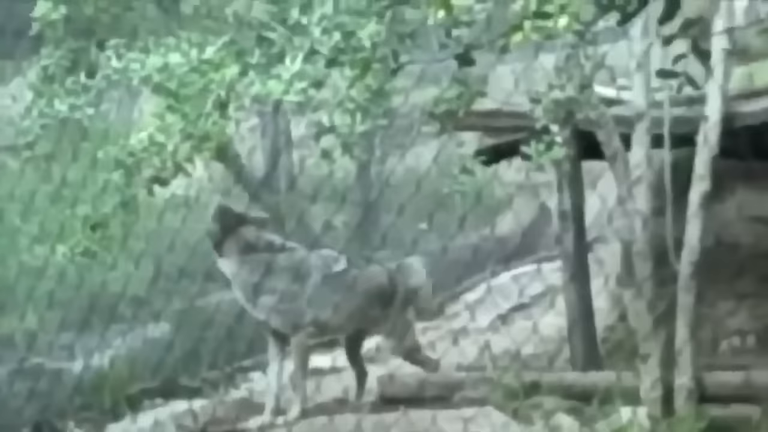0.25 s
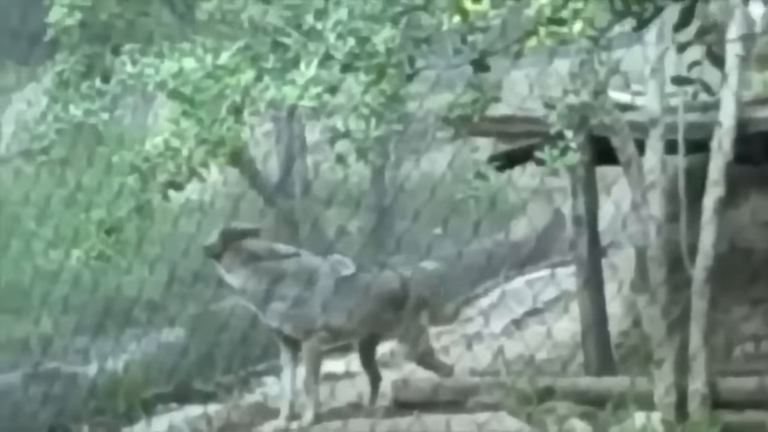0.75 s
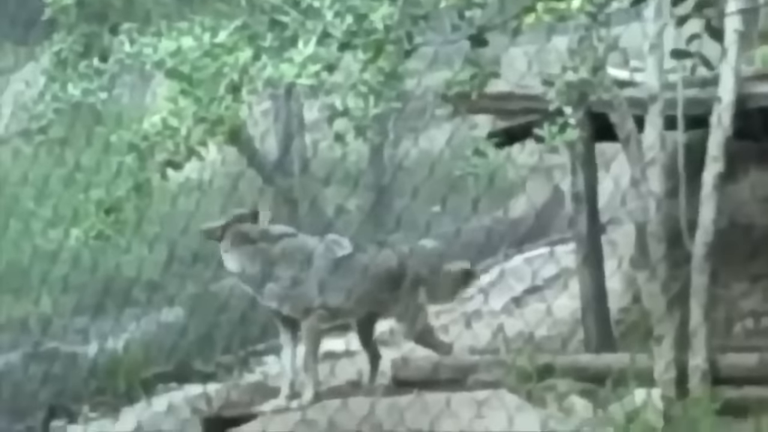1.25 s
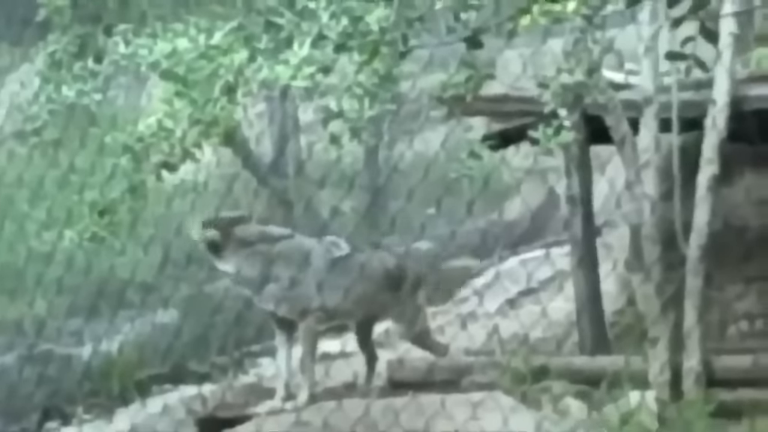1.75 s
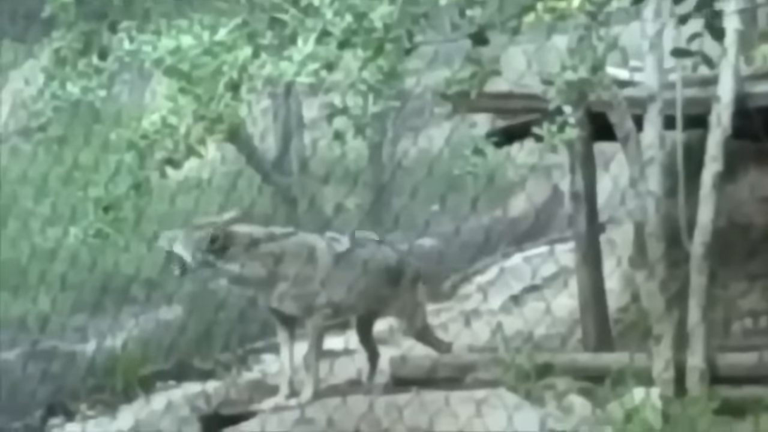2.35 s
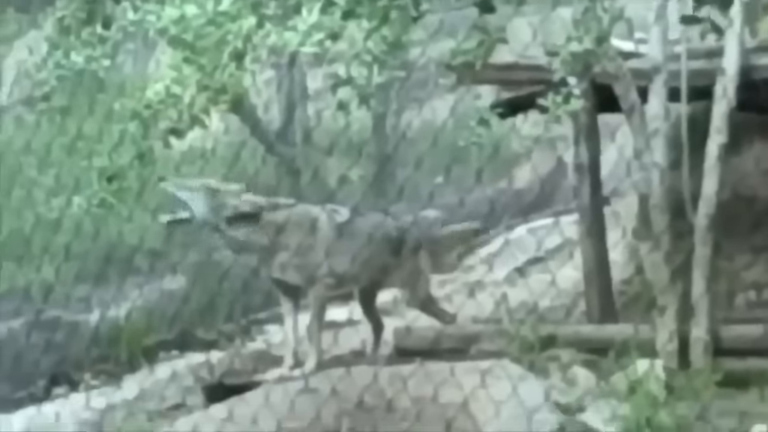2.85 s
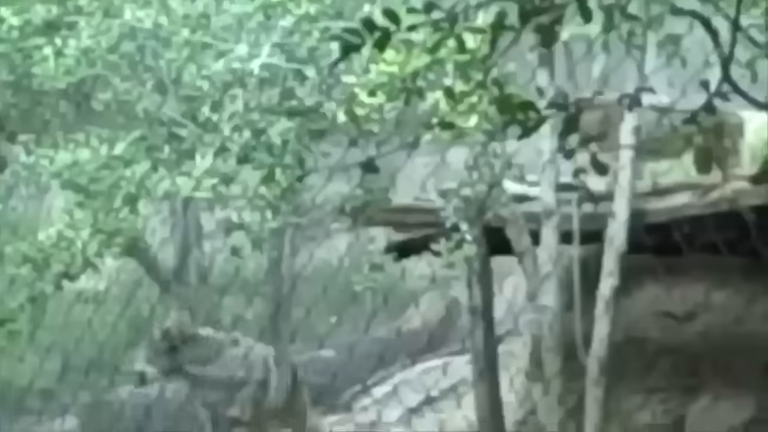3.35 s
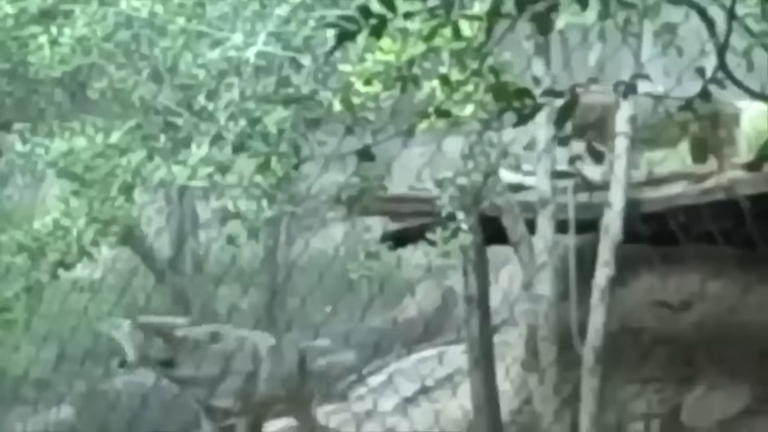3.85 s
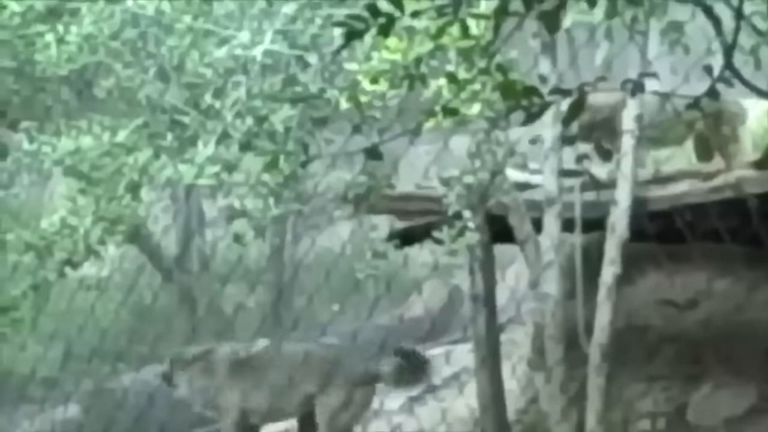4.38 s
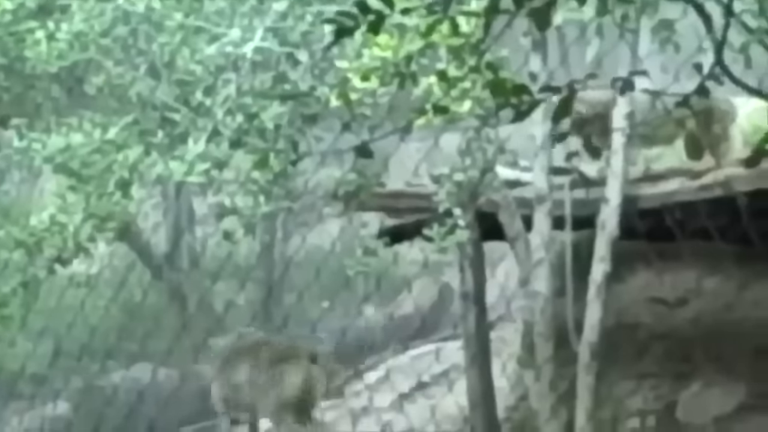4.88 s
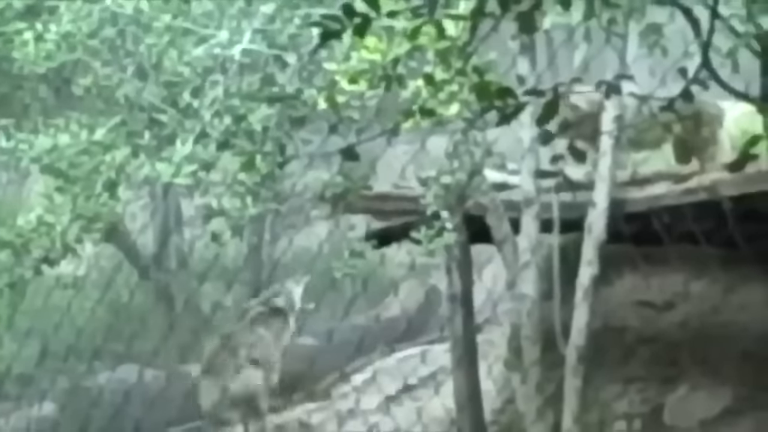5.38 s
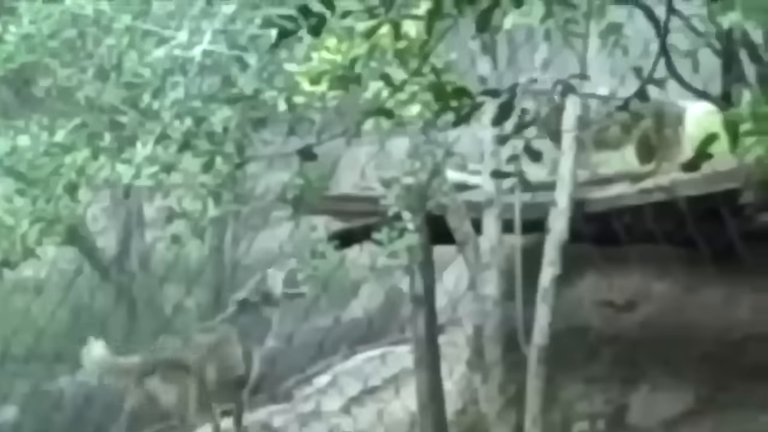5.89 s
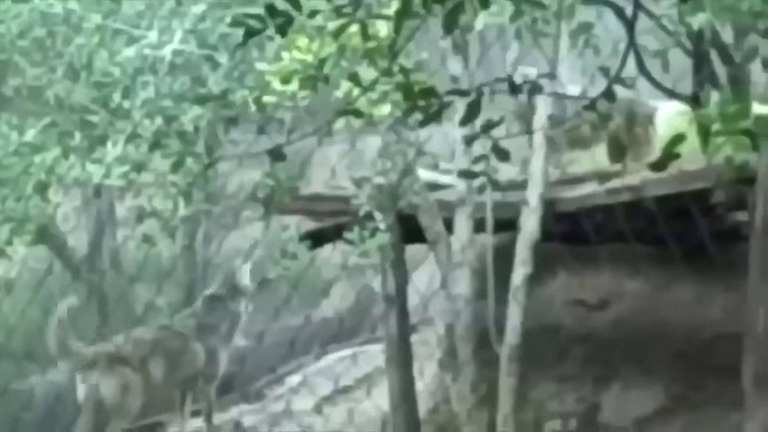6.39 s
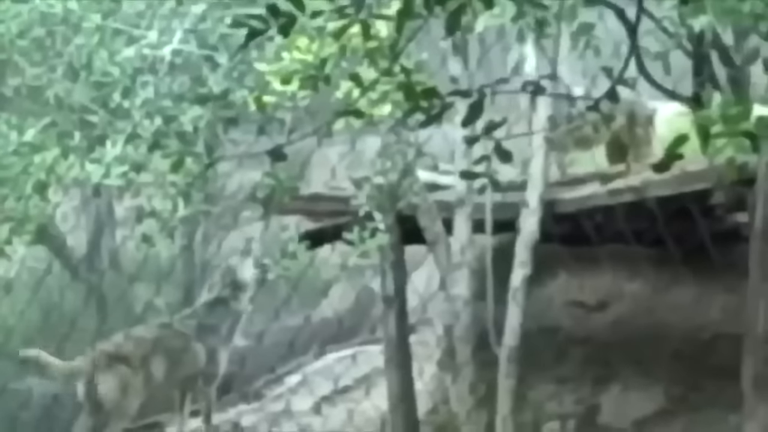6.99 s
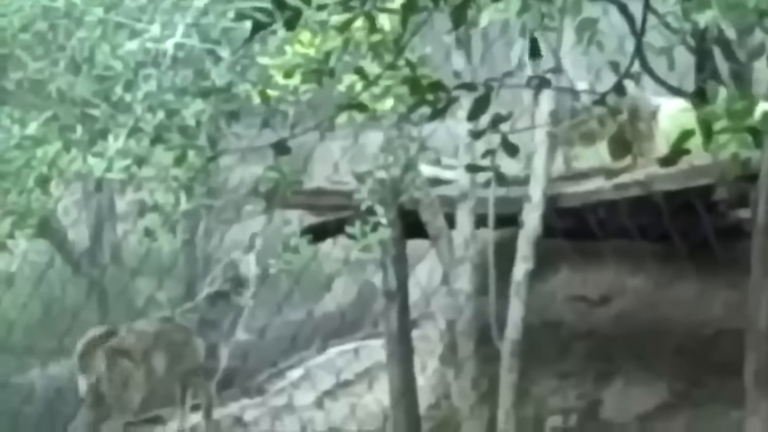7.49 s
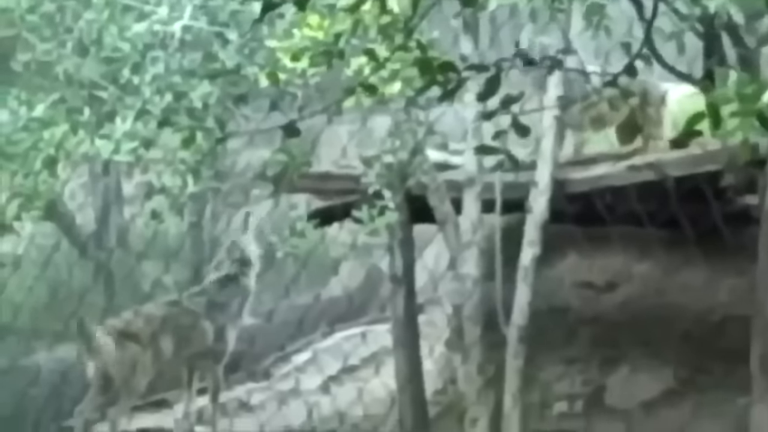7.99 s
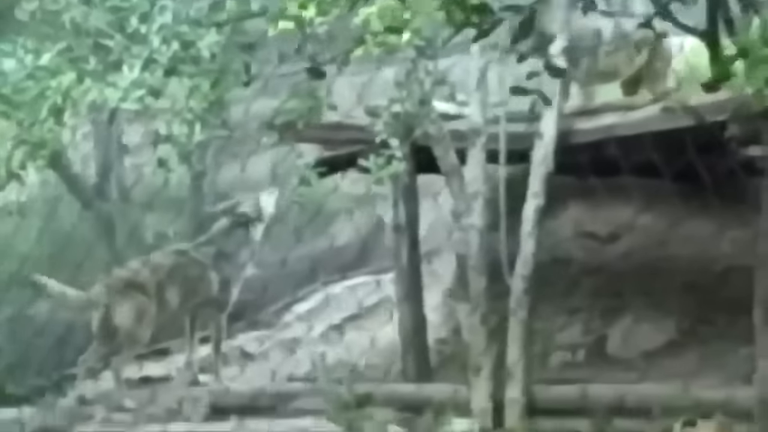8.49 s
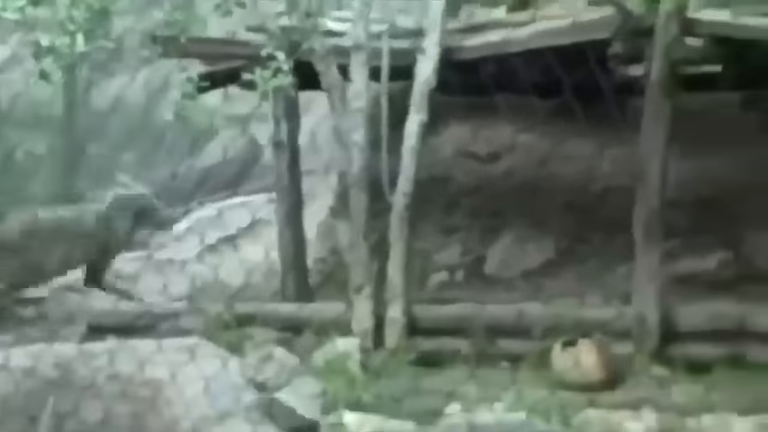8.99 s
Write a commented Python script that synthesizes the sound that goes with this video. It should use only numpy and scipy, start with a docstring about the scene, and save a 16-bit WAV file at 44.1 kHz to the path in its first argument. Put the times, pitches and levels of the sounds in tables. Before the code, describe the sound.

From 0 s coyotes are already calling: a high yelp falls quickly over a steadier clear howl, and a hoarse bark joins at 0.4 s. Around 0.6-2 s a high howl wavers, leaps up near 1.3 s, then slides far down while lower voices overlap. From 2.2 s rough barks gather, with a shrill cracked burst near 2.7-2.9 s. Through 3-5 s low falling yips, short barks and a clear strong yelp at 4 s mix with a high, shaky cry at 4.3-4.8 s. Another high swoop comes at 5.1-5.4 s. From 5.5 to 8.2 s raspy barks and quick yelps tumble together. The last calls sink into wavering moans, ending by 8.9 s. Short diffuse echoes come off trees and rock. Quiet air and distant traffic rumble remain, with a faint rustle and sharp dry ticks near the microphone at about 9.1 s.

```python
"""Coyote chorus in a wooded pen

Several coyotes howl, yip and bark over one another, then break off. Clean calls are gliding harmonic series;
barks add half tones by period doubling, with rasp where the voice breaks into chaos. Trees and rock return the
calls as a decaying noise tail. Shaped noise makes the far traffic rumble and air, under a faint drone; ticks and
a rustle of noise come at the end. A limiter, a soft ceiling, a high-passed hiss scaled by the loudness, and a
low-pass end the chain."""
import sys
import numpy as np
from scipy import signal
from scipy.fft import rfft, irfft, next_fast_len
from scipy.io import wavfile
from scipy.ndimage import uniform_filter1d, minimum_filter1d

SR = 44100
rng = np.random.default_rng(int(sys.argv[2]) if len(sys.argv) > 2 else 0)


def materialize(psi):
    """Save the field psi as 16-bit PCM at rate SR to the path in sys.argv[1].

    A 1-D psi becomes a single channel; in a 2-D psi each row is a channel.
    """
    bounded = np.clip(np.atleast_2d(psi).T, -1, 1)
    quanta = np.round(bounded * 32767).astype(np.int16)
    wavfile.write(sys.argv[1], SR, quanta)


N = 407484

# background spectrum, relative: hz, density_db (per Hz)
AIR_SPECTRUM = [(20, -8), (65, 2), (120, 1.5), (190, -3), (320, -8.5), (2500, -12.5), (4500, -32.5),
                (7500, -21.5), (15500, -45)]
AIR_DB = -44.5  # mean level, about which the background wavers
# faint drone passing far off: time_s, pitch_hz, level_db
DRONE = [(3.3, 269, -49.5), (3.6, 263, -44), (3.95, 272, -53), (4.2, 287, -45), (4.6, 283, -59),
         (9.24, 243, -54)]
# leaves or cloth stirring: time_s, level_db
RUSTLE = [(9.04, -70), (9.078, -52), (9.24, -54.5)]
# dry ticks nearby: time_s, peak_db
TICKS = [(9.081, -28), (9.086, -29), (9.0892, -23)]
ECHO_T60_S, ECHO_DB, ECHO_CUT_HZ = 0.3, -8.5, 11500

# filtering by mouth and distance: hz, gain_db
THROAT = [(900, 27), (1900, 17), (2900, 3.5), (3700, -13), (4700, -18.5), (7000, -22.5), (10000, -25.5),
          (11500, -38)]
# breath noise spectrum, relative: hz, density_db (per Hz)
BREATH_SPECTRUM = [(300, -82), (800, -13), (1500, 0), (3200, -24.5), (4100, -31.5), (7500, -23.5),
                   (15500, -40.5)]
# lift of the overtones above the edge: time_s, lift_db
TREBLE = [(0, 6.5), (1.3, -5), (1.9, 6.5), (3.2, 2.5), (5.6, 2.5), (8.3, 7), (9.0, 9.5)]
TREBLE_EDGE_HZ = 5800
# overtones above the edge weaken by this much per octave a second of glide
GLIDE_LOSS_DB, GLIDE_EDGE_HZ = 0.9, 3400

# hoarse barks: start_s, turn_s, end_s, start_hz, turn_hz, end_hz, first_partial_db, second_partial_db,
# half_tone_db, fade_after_turn_db, higher_lift_db
BARKS = [ (0.4, 0.471, 0.63, 619.6, 935.4, 902.5, -18.5, -23, -21.5, 6, 5),
         (2.269, 2.315, 2.4, 529.5, 689, 584, -30.5, -28.5, -25, 3.5, 7),
         (2.415, 2.445, 2.545, 637, 712.6, 630, -28, -22.5, -34.5, 7.5, 5.5),
         (2.8, 2.866, 3.07, 508.3, 790, 841, -30.5, -31, -30, -1.5, 13),
         (3.478, 3.529, 3.67, 529.5, 806.7, 798, -18.5, -21.5, -20.5, 21, 6),
         (3.683, 3.766, 3.84, 484, 776, 906, -22, -31.5, -31, 12, 14),
         (3.903, 3.944, 4.02, 873, 924, 925, -24.5, -34.5, -20.5, -2, 12.5),
         (4.258, 4.291, 4.37, 769, 832, 985, -26, -26, -29, 4, 3),
         (4.444, 4.529, 4.69, 699, 865, 787, -23, -25, -27, 6, -4),
         (4.831, 4.907, 5.06, 746, 960.5, 917, -15, -21.5, -39.5, 12.5, 4.5),
         (4.985, 5.087, 5.15, 647.4, 818, 934, -32.5, -31, -31, -7, 11.5),
         (5.308, 5.348, 5.45, 577, 683, 838, -33, -33, -27.5, -13, 9),
         (5.557, 5.636, 5.75, 600.6, 910, 987, -17.5, -19, -23.5, 3.5, 13),
         (6.091, 6.198, 6.29, 437.7, 909, 850, -30.5, -29, -23, -4, 12),
         (6.29, 6.405, 6.46, 518.7, 869, 878, -21.5, -28, -22, -4, 4),
         (6.641, 6.685, 6.712, 684, 912, 1000, -19.5, -23, -18, -2, 9.5),
         (6.702, 6.717, 6.787, 906, 885, 938, -19.5, -15, -20, 6.5, 9),
         (6.868, 6.905, 6.99, 656, 799, 746, -24, -28, -21, 12, 3),
         (7.07, 7.155, 7.275, 619, 913, 841, -21, -23, -17.5, 4.5, 5),
         (7.547, 7.607, 7.66, 647, 851, 900, -16.5, -25, -19.5, -1.5, 8),
         (7.812, 7.869, 7.94, 940, 996, 860, -30, -23, -21, 3, 4.5),
         (8.091, 8.141, 8.225, 618.4, 840.6, 750, -19.5, -26, -22, 10, -3), ]
# depth of each part under its own level: start_db, midway_db, end_db (beyond the fade)
FIRST_UNDER = (10.5, 0.85, 10.2)
SECOND_UNDER = (19, 3.9, 1)
HALF_UNDER = (66, 7.5, 11.8)
SCOOP_SHARE = 0.55  # share of the change in pitch done halfway to the turn
BARK_LIFT_EDGE_HZ = 3900  # a bark's higher lift stops here
# breaks into chaos: time_s, half_width_s, depth (0-1), rasp_db, shrill_rasp_db
BREAKS = [(2.667, 0.014, 0.7, -28, -28.5), (2.783, 0.0055, 0.55, -31, -28.5), (2.9, 0.15, 0, -32, -52),
          (3.52, 0.04, 0.24, -39, -40.5), (3.785, 0.06, 0.38, -32.5, -42), (3.95, 0.05, 0.32, -24, -48),
          (4.321, 0.034, 0.62, -28, -33), (5.121, 0.054, 0.7, -28, -31.5), (5.604, 0.041, 0.28, -24, -31),
          (6.167, 0.032, 0.29, -37, -31), (6.26, 0.085, 0.01, -31, -27), (7.602, 0.069, 0.14, -31, -54),
          (7.88, 0.058, 0.26, -36, -27.5), (8.525, 0.02, 0.1, -39, -51)]
# band of the shrill rasp: low_hz, high_hz
SHRILL_BAND_HZ = [2130, 3680]

# clean calls, long or short, with a drawn pitch course: second_lift_at_start_db, second_lift_at_end_db,
# higher_lift_db, course (rows of time_s, pitch_hz, level_db)
DRAWN_CALLS = [ (-8, 2.5, 0, [(0.0, 814, -39.5), (0.078, 941, -12.5), (0.134, 1028, -12.5),
               (0.21, 984.4, -22), (0.37, 987, -25), (0.46, 991, -29)]), (-11, 2.5, 2, [(0.58, 1237, -17),
               (0.622, 1434, -25), (0.642, 1346, -23), (0.948, 1261, -20), (1.03, 1317, -20.5),
               (1.06, 1196, -30), (1.158, 1233, -18.5), (1.226, 1887, -13.5), (1.28, 1982, -12),
               (1.33, 1820, -13.5), (1.39, 1763, -17), (1.43, 1509, -19.5), (1.49, 1388, -20),
               (1.53, 1195, -26), (1.58, 1097, -18.5), (1.62, 913, -30), (1.73, 744, -26),
               (1.8, 716.5, -18), (1.884, 790.7, -24), (1.97, 665.4, -30.5), (2.045, 652, -26.5),
               (2.104, 722, -15), (2.16, 811, -29)]), (28, 14, 10, [(1.85, 777.5, -32.5),
               (1.91, 807, -32.5), (1.99, 592.6, -48.5), (2.07, 630, -29), (2.14, 592, -43)]),
               (25, 36, 4.5, [(2.17, 481.3, -44), (2.22, 501, -38), (2.28, 500, -33)]),
               (12, 25, 6.5, [(2.99, 847, -16.5), (3.03, 763, -28.5), (3.07, 745, -18.5), (3.115, 659, -29),
               (3.17, 631, -25), (3.215, 550, -27), (3.245, 470, -40)]), (3, 15, 5, [(7.65, 910, -24),
               (7.68, 941, -23), (7.714, 868, -23.5), (7.78, 918, -28), (7.83, 959, -23)]),
               (-11, 24, 2.5, [(6.763, 1260, -16), (6.785, 1290, -20.5), (6.83, 1138, -23),
               (6.85, 900, -27.5), (6.885, 790, -25)]), (-18, 25, 6, [(0.672, 670, -29.5),
               (0.748, 795, -19), (0.8, 758, -30), (0.945, 787, -38)]), (5, 2.5, 8, [(0.935, 743, -31),
               (0.995, 998, -25), (1.06, 950, -29), (1.254, 766, -37.5), (1.316, 886, -22.5),
               (1.384, 789, -42.5), (1.454, 987, -19.5), (1.608, 943, -33), (1.66, 846, -22.5)]),
               (21.5, 11, 6.5, [(2.158, 735.3, -23), (2.378, 795.6, -26.5), (2.466, 748, -24),
               (2.612, 846, -25), (2.67, 942, -23.5), (2.705, 925, -26.5), (2.74, 891, -27.5),
               (2.775, 1013, -19.5), (2.81, 966, -58), (2.98, 1000, -37)]),
               (2.5, 12, 14.5, [(3.29, 475, -20), (3.318, 548, -32.5), (3.334, 614, -20.5),
               (3.358, 588.3, -38.5), (3.508, 593.4, -40), (3.63, 517, -34.5)]),
               (-8.5, 15, 2, [(3.99, 965, -63), (4.004, 962, -8.5), (4.06, 935, -21.5), (4.11, 979, -17),
               (4.2, 947.5, -25), (4.26, 821, -25.5), (4.33, 779, -27)]), (-30, 21, -6, [(4.315, 779, -22),
               (4.38, 612.6, -17.5), (4.44, 596, -19.5), (4.48, 572, -26)]),
               (-0.5, -4, -4.5, [(4.325, 1825, -23), (4.36, 1912, -21.5), (4.606, 1727, -35),
               (4.654, 1705, -29), (4.702, 1982, -19), (4.735, 1920, -22.5), (4.775, 1080, -28.5)]),
               (2.5, -5.5, -3.5, [(5.09, 956, -26), (5.16, 1751, -22.5), (5.29, 1679, -25.5),
               (5.335, 1485, -22.5), (5.405, 1460, -27), (5.432, 934, -23.5), (5.5, 565, -42),
               (5.57, 582, -20.5)]), (8, 13.5, 0.5, [(5.79, 706, -47), (5.852, 838, -17.5),
               (5.9, 857, -24.5), (5.98, 883.6, -16), (6.01, 884, -48), (6.078, 861, -45),
               (6.1, 890, -42)]), (8.5, 1.5, -2, [(7.04, 642, -47), (7.078, 651, -25),
               (7.294, 584.6, -25.5), (7.376, 544, -28.5), (7.534, 599, -21), (7.56, 653, -18),
               (7.62, 675, -54), (7.75, 685, -41)]), (16, 9, 4, [(7.74, 693, -36), (7.816, 599.5, -25.5),
               (7.85, 613, -25), (8.004, 484, -32.5), (8.06, 599, -18), (8.1, 620, -34)]),
               (-14, 7.5, 3.5, [(7.87, 1528, -29), (7.924, 1399, -23), (7.948, 1263, -21),
               (8.046, 1158, -23.5), (8.18, 822, -27.5)]), (7.5, 30, -3, [(8.21, 728, -36),
               (8.26, 838, -19.5), (8.3, 758, -35), (8.37, 756, -31), (8.4, 700, -27), (8.5, 664, -45)]),
               (-4, 6.5, 3, [(8.43, 703, -34.5), (8.525, 603, -21), (8.58, 621, -19), (8.67, 637, -27.5),
               (8.75, 818, -26.5), (8.85, 772, -34), (8.9, 640, -38.5)]), (-4, 4, 8.5, [(2.775, 1449, -22),
               (2.85, 1325, -18.5), (2.885, 1515, -19.5), (2.915, 1480, -20.5), (2.945, 1340, -25),
               (2.978, 1066, -25)]), ]
# short clean calls and call fragments, each with one turn: start_s, turn_s, end_s, start_hz, turn_hz, end_hz,
# level_db, fade_after_turn_db, second_lift_db, higher_lift_db
TURN_CALLS = [ (0.0, 0.1, 0.162, 1699, 1749, 1060, -18, 9.4, -2, -6.5),
              (3.521, 3.59, 3.705, 850, 685, 576, -30.5, 11.4, 20, 8.5),
              (3.811, 3.834, 3.92, 705, 774, 774, -26.5, 5.4, 19, -3),
              (3.893, 3.92, 3.985, 550, 695.4, 682, -18.5, 18, 10.5, -2),
              (5.446, 5.521, 5.7, 756, 841, 904, -27, 13, 11.5, 9.5),
              (5.733, 5.834, 5.86, 1553, 1312, 875, -23, 15, 0, 6),
              (6.197, 6.288, 6.303, 901, 969, 970, -14.5, 38, 11.5, 10),
              (6.311, 6.346, 6.425, 1775, 1654, 1630, -16.5, 16, 5, -9),
              (6.439, 6.492, 6.6, 862, 795, 672, -22.5, 32, 18, 3),
              (6.769, 6.85, 6.875, 421, 616, 640, -26, 2.4, 10, -2),
              (6.949, 7.039, 7.07, 668, 620, 642, -32.5, 2.6, 28, -13),
              (7.251, 7.293, 7.325, 859, 912, 932, -21.5, 9.7, 11, -1.5),
              (7.309, 7.39, 7.426, 1145, 1142, 790, -24, 9.5, 6.5, -4.5),
              (7.417, 7.508, 7.56, 896, 715, 679, -30, 1, 0.5, 11.5), ]
TURN_SWELL_DB = 3.5  # growth of a one-turn call up to its turn
# second partial relative to the first, before each call's lift: pitch_hz, ratio_db
SECOND_OVER_FIRST = [(500, -26), (760, -6), (900, -1.5), (1000, -6), (1300, -8.5), (1900, -15)]
# high voice turning unsteady and breathy: time_s, half_width_s, depth (0-1)
QUAVERS = [(4.4, 0.06, 0.6), (4.57, 0.05, 0.5), (4.765, 0.025, 1.0)]
HIGH_VOICE_HZ, QUAVER_HZ = 1050, 170  # voices above this pitch quaver; corner rate of the flutter

CEILING = 0.57  # soft ceiling, as amplitude
LIMIT_OVER = 1.12  # the limiter works from this multiple of the ceiling
HISS_DB = -34  # hiss relative to the loudness, before its high-pass
CUTOFF_HZ = 15700  # upper limit of the partials and of the final low-pass


def from_db(db):
    """Decibel law: 20 dB is a factor of ten in amplitude."""
    return 10 ** (np.asarray(db) / 20)


def rms_one(x):
    """Normalization to unit root mean square."""
    return x / np.sqrt(np.mean(x ** 2) + 1e-20)


def at_hz(points, hz):
    """Linear interpolation on a logarithmic frequency axis."""
    known_hz, values = np.array(points).T
    return np.interp(np.log(hz), np.log(known_hz), values)


def hump(s, width):
    """Flat-topped fourth-power exponential window in time."""
    return np.exp(-((np.arange(N) / SR - s) / width) ** 4)


def wobble(rate):
    """Slow random modulation of unit spread: noise through two one-pole low-passes with corner rate in Hz."""
    r = np.exp(-2 * np.pi * rate / SR)
    noise = rng.standard_normal(N + 4000)
    settled = signal.lfilter([1], [1, -2 * r, r * r], noise)[4000:]
    return rms_one(settled)


def coloured(spectrum):
    """Spectral shaping: white noise weighted in the frequency domain, at unit rms."""
    size = next_fast_len(N)
    hz = np.maximum(np.arange(size // 2 + 1) * SR / size, 1)
    weighted = rfft(rng.standard_normal(size)) * from_db(at_hz(spectrum, hz))
    return rms_one(irfft(weighted, size)[:N])


def span(rows):
    """Piecewise-linear envelopes: sample indices, columns with rounded corners, and a short fade at the ends."""
    s, *columns = np.transpose(rows)
    at = np.arange(max(0, round(s[0] * SR)), min(N, round(s[-1] * SR)))
    # a call starting at time zero is already sounding, without a fade in
    from_start = at - at[0] + SR * (at[0] == 0)
    fade = np.clip(np.minimum(from_start, at[-1] - at) / (0.0069 * SR), 0, 1) ** 2
    curves = [uniform_filter1d(np.interp(at / SR, s, c), size=700, mode="nearest") for c in columns]
    return at, curves, fade


def surroundings():
    """Superposition of independent sources: rumble and air, drone, rustle and ticks."""
    out = from_db(AIR_DB + wobble(5)) * coloured(AIR_SPECTRUM)

    at, (pitch, level_db), fade = span(DRONE)
    phase = 2 * np.pi * np.cumsum(pitch) / SR
    # the upper tone stands a fifth above
    out[at] += fade * from_db(level_db) * (np.sin(phase) + 0.5 * np.sin(3 / 2 * phase))

    bright = signal.butter(2, [3500, 15000], "band", fs=SR, output="sos")
    at, (rustle_db,), fade = span(RUSTLE)
    rustle = rms_one(signal.sosfilt(bright, rng.standard_normal(N)))
    out[at] += fade * from_db(rustle_db) * rustle[at]

    bursts = rng.standard_normal((len(TICKS), 200)) * np.exp(-np.arange(200) / 64.0)
    snap = signal.butter(2, 6000, "high", fs=SR, output="sos")
    for (s, peak_db), tick in zip(TICKS, signal.sosfilt(snap, bursts)):
        i = min(round(s * SR), N - 200)
        out[i:i + 200] += from_db(peak_db) * tick / np.abs(tick).max()
    return out


def echoes(x):
    """Diffuse scattering from trunks and rock: convolution with a decaying noise tail after a short gap."""
    t = np.arange(round(1.2 * SR)) / SR
    tail = rng.standard_normal(len(t)) * from_db(-60 * t / ECHO_T60_S) * (t > 0.015)
    tail = signal.sosfilt(signal.butter(1, ECHO_CUT_HZ, fs=SR, output="sos"), tail)
    unit_energy = tail / np.sqrt(np.sum(tail ** 2))
    return from_db(ECHO_DB) * signal.fftconvolve(x, unit_energy)[:N]


def partials(at, phase, pitch, first_db, anchor, anchor_db, bright_db, flicker, lift_edge_hz=np.inf):
    """Source-filter principle: partials from the anchor multiple up follow the throat, each flickering apart."""
    out = from_db(first_db + flicker) * np.sin((anchor - 1) * phase)
    # levels are worked out at every 40th sample and interpolated
    fine, step = np.arange(len(phase)), slice(None, None, 40)
    time_s = at[step] / SR
    treble_db = np.interp(time_s, *np.transpose(TREBLE))
    octaves = uniform_filter1d(np.log2(pitch[step]), size=15)
    glide = uniform_filter1d(np.abs(np.gradient(octaves, time_s)), size=15)
    anchor_gain_db = at_hz(THROAT, anchor * pitch[step])
    for k in np.arange(anchor, 18):
        hz = k * pitch[step]
        level_db = anchor_db[step] + at_hz(THROAT, hz) - anchor_gain_db
        level_db = level_db + bright_db * (k > anchor) * (hz < lift_edge_hz)
        level_db = level_db + treble_db * (hz > TREBLE_EDGE_HZ)
        level_db = level_db - GLIDE_LOSS_DB * np.minimum(glide, 10) * (hz > GLIDE_EDGE_HZ)
        # shifted flicker sets the partials apart; it grows with the multiple
        own_flicker = np.roll(flicker[step], int(k * 37)) * k ** 0.55
        level_db = level_db + np.minimum(own_flicker, 6)
        amplitude = np.interp(fine, fine[step], from_db(level_db) * (hz < CUTOFF_HZ))
        out = out + amplitude * np.sin(k * phase + k * k)
    return np.sqrt(2) * out  # the levels are rms


def chaos():
    """Loss of periodicity: depth of the breakdown and amplitudes of its two rasps over time."""
    return sum(np.outer([np.clip(share, 0, 1), from_db(rasp_db), from_db(shrill_db)], hump(s, width))
               for s, width, share, rasp_db, shrill_db in BREAKS)


def bark_course(start, turn, end, low, top, last, first_db, second_db, half_db, fade_db):
    """Growth of period doubling: rows of time, pitch and three levels, the half tone centred on the turn."""
    parts = [[db - early, db - midway, db, db - fade_db - late] for db, (early, midway, late)
             in [(first_db, FIRST_UNDER), (second_db, SECOND_UNDER), (half_db, HALF_UNDER)]]
    pitch = [low, low + SCOOP_SHARE * (top - low), top, last]
    return np.transpose([[start, (start + turn) / 2, turn, end], pitch, *parts])


def barks():
    """Period doubling: alternate strong and weak cycles give half tones; in a break the cycles lose order."""
    out, jitter, shimmer, tear = np.zeros(N), wobble(94.5), wobble(34), wobble(220)
    rasp = coloured(BREATH_SPECTRUM)
    depth, rasp_level, shrill_level = chaos()
    shrill_band = signal.butter(4, SHRILL_BAND_HZ, "band", fs=SR, output="sos")
    shrill = rms_one(signal.sosfilt(shrill_band, rng.standard_normal(N)))
    for *bark, bright_db in BARKS:
        at, (pitch, first_db, second_db, half_db), fade = span(bark_course(*bark))
        pitch = pitch * (1 + (0.0079 + 0.07 * depth[at]) * jitter[at])
        phase = 2 * np.pi * np.cumsum(pitch) / SR
        whole = partials(at, phase, pitch, first_db, 2, second_db, bright_db,
                         2.9 * shimmer[at], BARK_LIFT_EDGE_HZ)
        halves = partials(at, phase, pitch, half_db - 30.0, 1.5, half_db, bright_db,
                          3.16 * shimmer[at][::-1], BARK_LIFT_EDGE_HZ)
        # uneven cycle strength smears every partial
        torn = (whole + halves) * (1 + (0.08 + 0.2 * depth[at]) * tear[at])
        hiss_db = (half_db + second_db) / 2 - 11
        # breath pulses once in two cycles
        hiss = from_db(hiss_db) * (1 + np.cos(phase / 2)) * rasp[at]
        out[at] += fade * (torn + hiss)
    broken = (rasp_level * rasp + shrill_level * shrill) * from_db(2.0 * tear)
    return out + broken


def clean_courses():
    """Regular phonation along a course: drawn calls, and one-turn calls that swell to the turn and then fade."""
    turned = [(second, second, bright, [(a, fa, db - TURN_SWELL_DB), (b, fb, db), (c, fc, db - fade)])
              for a, b, c, fa, fb, fc, db, fade, second, bright in TURN_CALLS]
    return DRAWN_CALLS + turned


def clean_calls():
    """Periodic vocal-fold oscillation with slight jitter, waver, shimmer and breath."""
    out, jitter, waver, shimmer = np.zeros(N), wobble(49.0), wobble(10.84), wobble(17.6)
    breath = coloured(BREATH_SPECTRUM)
    quaver = sum(depth * hump(s, width) for s, width, depth in QUAVERS)
    flutter = wobble(QUAVER_HZ)
    for early_lift_db, late_lift_db, bright_db, rows in clean_courses():
        at, (pitch, level_db), fade = span(rows)
        lift_db = np.linspace(early_lift_db, late_lift_db, len(at))
        lead_db = at_hz(SECOND_OVER_FIRST, pitch) + lift_db
        # the louder of the two partials carries the level
        first_db = level_db - np.maximum(lead_db, 0)
        second_db = level_db + np.minimum(lead_db, 0)
        shaky = quaver[at] * (pitch > HIGH_VOICE_HZ)
        pitch = pitch * (1 + 0.00356 * jitter[at] + 0.0045 * waver[at] + 0.05 * shaky * flutter[at])
        phase = 2 * np.pi * np.cumsum(pitch) / SR
        flicker_db = 2.1 * shimmer[at]
        voice = partials(at, phase, pitch, first_db, 2, second_db, bright_db, flicker_db)
        breath_db = np.maximum(first_db, second_db) - 35 + 25 * shaky
        out[at] += fade * (voice + from_db(breath_db) * breath[at])
    return out


def scene():
    """Linear superposition of the pack, its echoes and the surroundings."""
    pack = clean_calls() + barks()
    return (pack + echoes(pack) + surroundings())[None]


def record(dry):
    """Level-dependent gain: a limiter and a soft ceiling, then a high-passed hiss scaled by loudness, a low-pass."""
    peaks = -minimum_filter1d(-np.abs(dry), size=700)
    peaks = uniform_filter1d(peaks, size=700)
    held = dry * np.minimum(1, LIMIT_OVER * CEILING / peaks)
    squeezed = held / (1 + np.abs(held / CEILING) ** 6) ** (1 / 6)
    loudness = np.sqrt(np.maximum(uniform_filter1d(squeezed ** 2, size=900), 0))
    high_pass = signal.butter(2, 5000, "high", fs=SR, output="sos")
    hiss = signal.sosfilt(high_pass, rng.standard_normal(dry.shape))
    heard = squeezed + from_db(HISS_DB) * loudness * hiss
    return signal.sosfilt(signal.ellip(12, 0.5, 60, CUTOFF_HZ, fs=SR, output="sos"), heard)


dry = scene()
out = record(dry)
materialize(out)
```